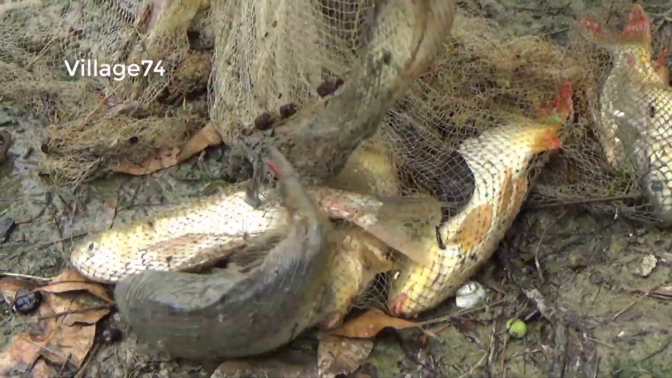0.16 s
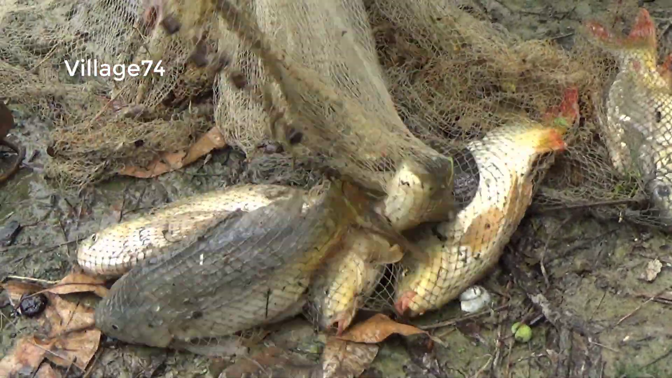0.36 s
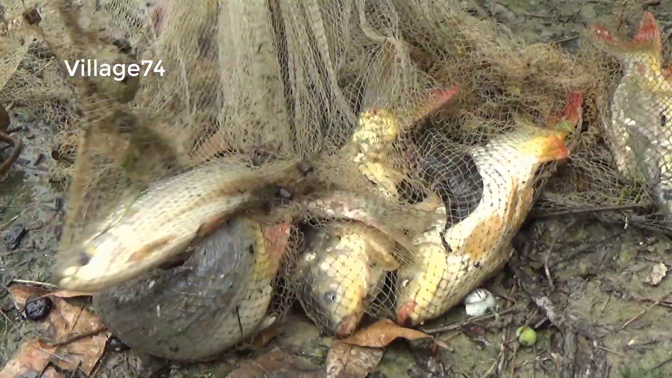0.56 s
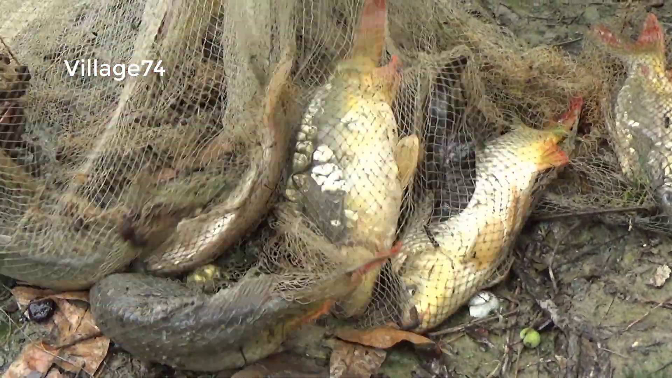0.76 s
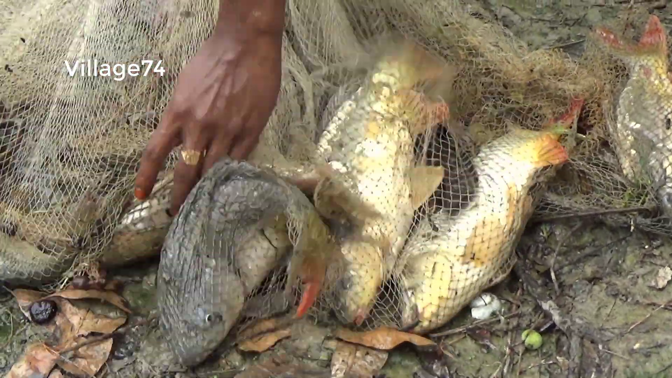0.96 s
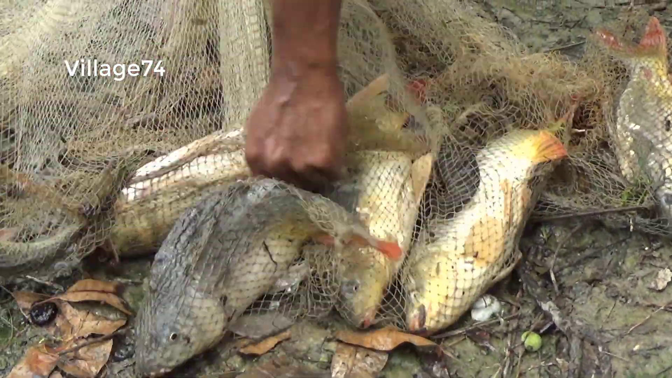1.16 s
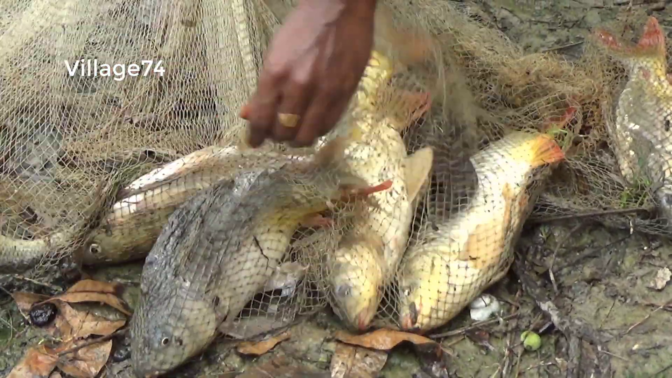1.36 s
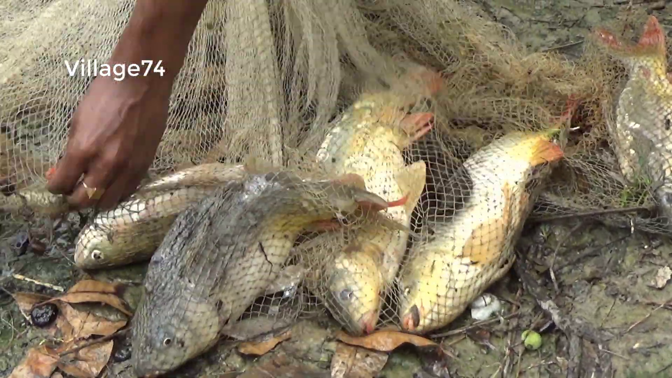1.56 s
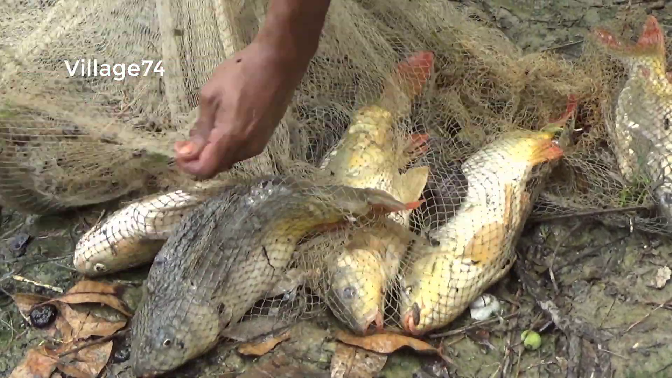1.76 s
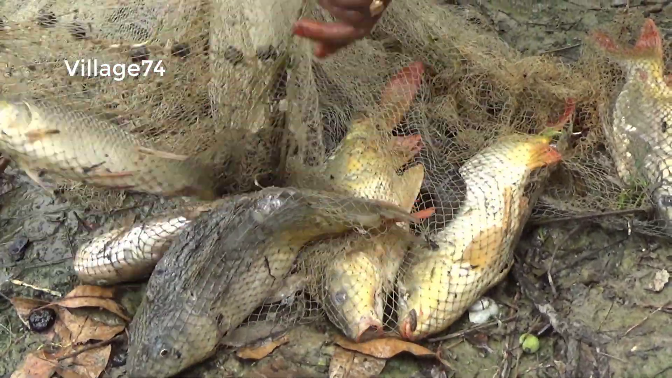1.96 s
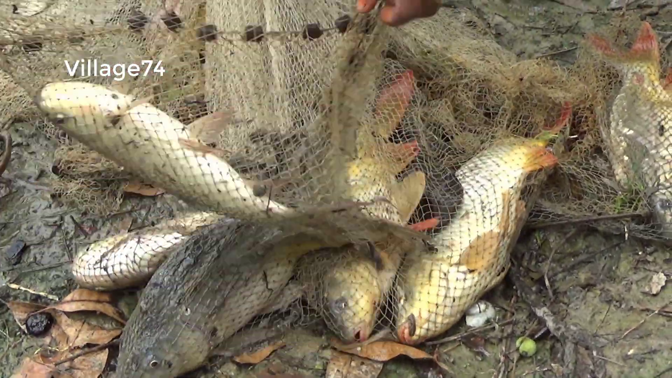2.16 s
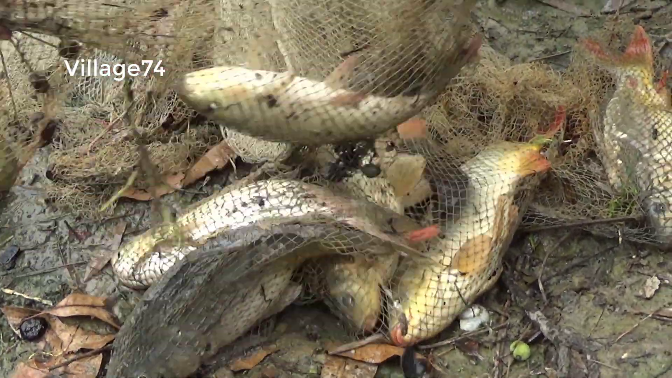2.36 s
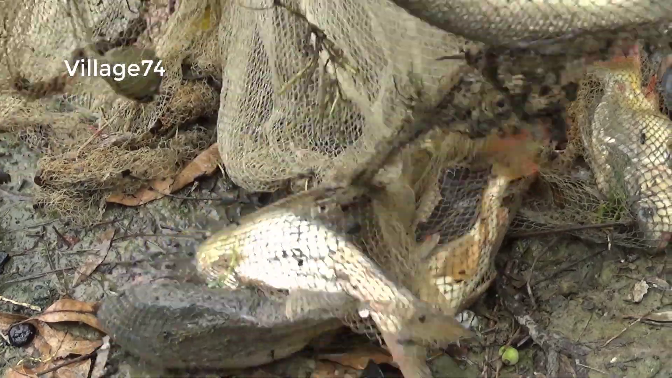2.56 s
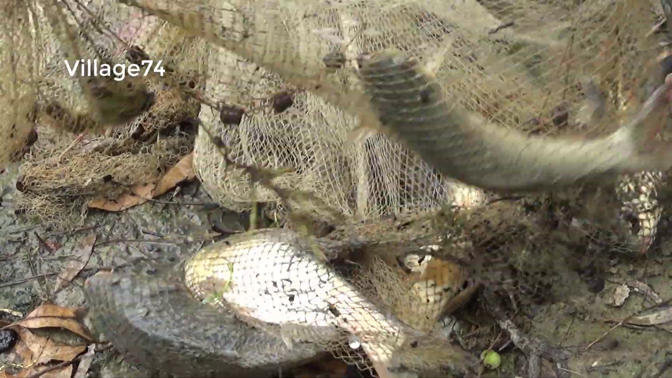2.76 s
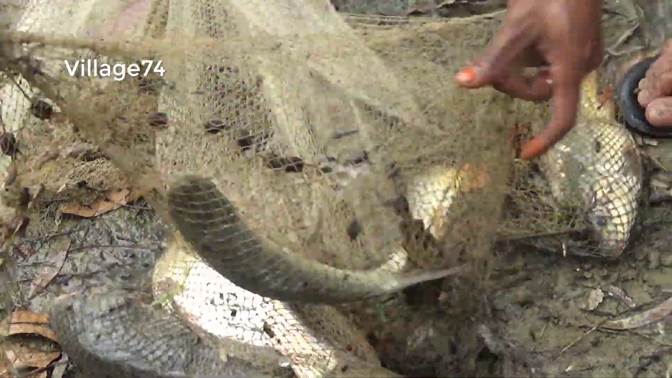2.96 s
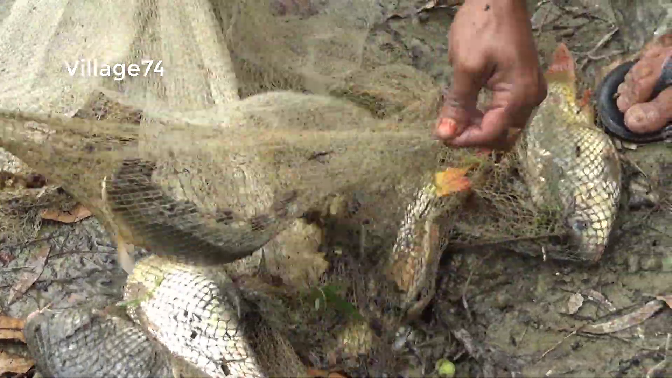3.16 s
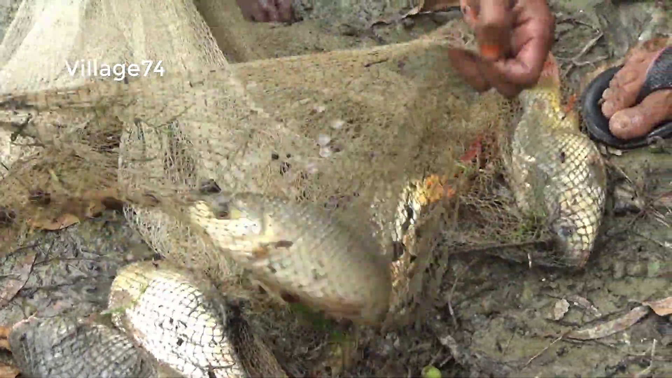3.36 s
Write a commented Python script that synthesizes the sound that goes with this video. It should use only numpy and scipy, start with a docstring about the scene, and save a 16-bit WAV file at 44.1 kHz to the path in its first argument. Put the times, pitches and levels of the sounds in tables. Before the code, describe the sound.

Freshly caught fish thrash with wet slaps and hollow knocks as a net crackles outdoors

```python
"""First a bird whistles over a quiet outdoor hush and the mesh of a net crackles on damp ground.
Then wet fish thrash: ringing modes give hollow knocks, noisy tones give wet slaps and bright snaps.
Lone blows follow, over dull thuds and the drag of the net; more birds, on the left, glide and echo.
Past two seconds the knocks return, a flank scrapes whining along the taut mesh, and the last blows land."""
import sys
import numpy as np
from scipy import signal
from scipy.fft import rfft, irfft
from scipy.io import wavfile
from scipy.ndimage import uniform_filter1d

SR = 44100
rng = np.random.default_rng(int(sys.argv[2]) if len(sys.argv) > 2 else 0)


def gain_from_db(level_db):
    """Turn a decibel level (scalar or array-like) into a linear amplitude factor."""
    decades = np.asarray(level_db, float) / 20
    return 10 ** decades


def file_out(sig):
    """Save sig as 16-bit WAV at sys.argv[1]."""
    # one column per channel
    cols = np.atleast_2d(sig).T
    # limit, then scale
    lim = np.clip(cols, -1, 1)
    pcm = np.round(lim * 32767).astype(np.int16)
    wavfile.write(sys.argv[1], SR, pcm)


N = 152145
T = np.arange(6000) / SR   # time axis of one blow [s]
LEAN = np.array([[1], [-1]])   # left up, right down

# Levels in the tables are relative; each layer trims them.
# hollow knocks of the bodies: (time [s], level [dB], pitch [Hz], lower mode against the main one [dB])
BODY_KNOCKS = [(0.11, -33.5, 850, -21), (0.237, -35.5, 873, -17), (0.302, -20, 778, -7),
               (0.315, -11, 788, -26), (0.32, -22, 755, -28), (0.352, -14.5, 818, -21.5),
               (0.486, -19.5, 800, -13.5), (0.514, -19.5, 786, -31), (0.555, -26.5, 816, -24),
               (0.62, -33.5, 854, -8), (0.673, -13.5, 782, -13.5), (0.685, -14.5, 748, -15),
               (0.695, -16.5, 817, -26), (0.798, -36.5, 711, -19), (0.853, -31.5, 887, -16),
               (0.887, -28, 875, -26), (0.909, -31, 803, -24), (0.957, -32, 832, -13),
               (1.106, -37, 800, -6.5), (1.12, -33, 880, -16), (1.367, -34, 890, -12.5),
               (1.439, -34, 817, -28), (1.552, -24.5, 873, -21), (1.565, -32, 860, -12),
               (1.73, -30, 894, -15), (1.785, -39, 890, -17), (1.916, -37, 796, -13),
               (1.939, -33.5, 690, -16), (2.223, -14, 800, -13), (2.255, -14.5, 752, -17),
               (2.382, -28.5, 792, -20), (2.507, -23, 782, -26), (2.551, -27.5, 794, -31),
               (2.675, -21.5, 860, -18.5), (2.688, -20, 790, -34), (2.704, -25, 796, -23),
               (2.827, -33, 945, -13), (2.881, -20.5, 800, -35), (2.904, -18.5, 821, -31),
               (2.911, -13.5, 800, -32), (2.942, -19.5, 832, -39), (2.957, -18.5, 808, -34),
               (3.066, -27.5, 893, -8.5), (3.156, -25.5, 832, -24), (3.173, -17, 760, -26)]
# ringing modes of a body: (multiple of pitch [ratio], level [dB], t60 [s])
BODY_MODES = [(1.002, 1, 0.041), (1.25, -11, 0.042)]
KNOCK_RISE_S = .0013
BELLY_HZ, BELLY_T60_S = 587, 0.077   # a lower mode shared by all knocks
# wet slaps of flanks: (time [s], level [dB], centre [Hz], t60 of the puff [s])
FLANK_SLAPS = [(0.3009, -9, 2520, 0.14), (0.3187, -12.5, 3730, 0.028), (0.3338, -17, 1290, 0.082),
               (0.3505, -19.5, 1860, 0.075), (0.4363, -21, 4200, 0.03), (0.5137, -22, 1460, 0.12),
               (0.6574, -21.5, 4500, 0.12), (0.6701, -10, 1970, 0.12), (0.6891, -15, 2130, 0.096),
               (0.6978, -12.5, 2130, 0.062), (0.8724, -17.5, 1880, 0.084), (1.091, -25, 3520, 0.12),
               (1.1067, -15.5, 2020, 0.04), (1.121, -17.5, 2590, 0.028), (1.2085, -22.5, 1440, 0.069),
               (1.3661, -28, 2090, 0.12), (1.437, -26.5, 2820, 0.12), (1.5392, -21.5, 2830, 0.03),
               (1.5468, -17.5, 3300, 0.048), (1.5645, -12, 2650, 0.059), (1.7292, -14, 2320, 0.05),
               (2.224, -23.5, 1447, 0.13), (2.2535, -10.5, 2073, 0.1), (2.3601, -22, 2890, 0.03),
               (2.3776, -25, 1300, 0.074), (2.5067, -23.5, 1190, 0.18), (2.6712, -25, 1250, 0.043),
               (2.6871, -19, 1570, 0.086), (2.7858, -20.5, 3840, 0.077), (2.9072, -20, 2220, 0.078),
               (2.937, -24, 1230, 0.054), (2.9553, -24, 1340, 0.086), (3.1721, -18.5, 2100, 0.053)]
SLAP_CRACK_T60_S, SLAP_TAIL_DB = .013, -8
# bright snaps of tails and taut mesh: (time [s], level [dB], centre [Hz], t60 of the spatter [s])
TAIL_SNAPS = [(0.07, -19, 9550, 0.11), (0.2408, -3, 9680, 0.072), (0.2723, -18, 9070, 0.097),
              (0.284, -12.5, 8400, 0.092), (0.2999, -3.5, 7970, 0.14), (0.3505, -10.5, 5400, 0.044),
              (0.3971, -7.5, 7960, 0.14), (0.402, -10, 6300, 0.05), (0.4129, -15, 9800, 0.059),
              (0.4354, -7, 10300, 0.1), (0.4604, -13, 9700, 0.089), (0.4797, -3.5, 10040, 0.094),
              (0.499, -2.5, 9500, 0.064), (0.5155, -3, 9500, 0.078), (0.5813, -17, 9360, 0.055),
              (0.6704, -3.5, 8370, 0.05), (0.6811, -2, 9200, 0.11), (0.686, -5, 8140, 0.14),
              (0.7043, -6.5, 9330, 0.033), (0.7996, -19.5, 9040, 0.057), (0.8544, -3.5, 7870, 0.019),
              (0.8715, 0.5, 9760, 0.12), (0.8751, -3, 8140, 0.074), (0.9038, -6, 8000, 0.045),
              (1.0925, -9.5, 8300, 0.054), (1.1066, -3.5, 7450, 0.045), (1.12, -9, 8900, 0.03),
              (1.1902, -14, 9400, 0.11), (1.2306, -14.5, 9500, 0.16), (1.3718, -15.5, 8160, 0.063),
              (1.4165, -13, 9800, 0.032), (1.4378, -13.5, 7350, 0.032), (1.5206, -8, 9300, 0.02),
              (1.5471, -5.5, 8900, 0.022), (1.5664, -2, 7375, 0.08), (1.7262, -3.5, 9300, 0.016),
              (1.7477, -11, 9370, 0.055), (2.169, -9.5, 8820, 0.019), (2.186, -20, 8100, 0.029),
              (2.2258, -19, 8450, 0.022), (2.2537, -5, 5375, 0.054), (2.5768, -12, 7550, 0.022),
              (2.604, -18.5, 9580, 0.028), (2.7713, -14, 9770, 0.061), (2.9258, -20, 8830, 0.048),
              (2.9387, -16.5, 8620, 0.08), (2.9556, -18.5, 8970, 0.071), (3.0587, -23, 9400, 0.036),
              (3.1314, -17.5, 8250, 0.054), (3.1472, -19, 5550, 0.063), (3.1742, -5, 10200, 0.027),
              (3.256, -23, 8200, 0.043), (3.272, -11, 8920, 0.092)]
SNAP_T60_S, SPATTER_DB, SPATTER_ROUGH_DB, LEAD_IN_S = .012, -11, 3.5, .002
# mesh pulled over the ground: (time [s], crackle level [dB], drag level [dB])
MESH_PULL = [(0, -38, -49), (.13, -51.5, -60.5), (.22, -53, -56), (0.378, -43.5, -44.5), (.46, -41, -45),
             (.56, -52.5, -49.5), (0.628, -44.5, -51.5), (0.719, -38.5, -39.5), (.78, -45, -56.5),
             (0.898, -35.5, -47), (1.04, -48, -53), (1.17, -44, -49), (1.318, -57, -61.5),
             (1.471, -44, -50.5), (1.65, -48, -59), (1.801, -50.5, -58.5), (2.05, -50.5, -73),
             (2.331, -50, -54.5), (2.4, -45, -41), (2.492, -40, -38), (2.58, -42, -44), (2.64, -46, -59),
             (2.78, -46.5, -49), (2.86, -50.5, -60), (2.999, -57, -55.5), (3.199, -45, -51.5),
             (3.32, -60, -67), (3.45, -54.5, -76)]
# spectrum of the mesh crackle: (frequency [Hz], level per Hz [dB])
CRACKLE_SPECTRUM = [(1500, -31), (3000, -0.5), (5000, -2), (7000, -3.5), (9500, 2), (12000, -6.5),
                    (15000, -7.5)]
# spectrum of the net dragging over soil: (frequency [Hz], level per Hz [dB])
DRAG_SPECTRUM = [(250, 12), (480, 2.5), (800, 8), (1200, 9), (2000, 8.5), (3500, 7.5), (5000, 0.5),
                 (6500, 5), (9000, 3.5)]
GRAINS_PER_S, GRAIN_SPREAD_DB, CLUMP_DB = 2000, 3.5, 3.5
TICKS_PER_S, TICK_DB = 45, -2   # lone ticks of knots
RATTLE_HZ, RATTLE_DB = 760, -5   # small bumps in the drag
# a flank along the taut mesh: (time [s], level [dB], whine of the threads [Hz])
FLANK_SCRAPE = [(2.35, -46, 4280), (2.41, -40, 4320), (2.47, -33.5, 5030), (2.52, -34, 5120),
                (2.59, -52, 4180)]
WHINE_WIDTH_HZ, WHINE_DB = 490, 3
# dull thuds on the ground: (time [s], level [dB], pitch [Hz])
GROUND_THUDS = [(0.311, -46, 282), (0.434, -44, 327), (0.491, -38, 344), (0.659, -40.5, 173),
                (0.886, -42, 265), (1.114, -34.5, 245), (1.412, -41.5, 276), (1.547, -39, 323),
                (1.723, -39, 354), (2.252, -38.5, 342), (2.39, -38.5, 362), (2.437, -35.5, 373),
                (2.683, -42, 340), (2.783, -41, 257)]
THUD_T60_S = .04
# whistle that rises and falls: (time from start [s], pitch [Hz], level [dB])
ARCH_SHAPE = [(0, 2013, -14), (.013, 2711, -16), (.021, 3323, -5), (.025, 3770, -3), (.029, 4117, 0),
              (.04, 3896, -3.5), (.043, 3650, -10), (.047, 3407, 2), (.053, 3007, -6.5), (.064, 2590, -7)]
# its notes: (time [s], level [dB])
ARCH_NOTES = [(1.563, -37.5), (1.821, -36.5), (1.981, -35.5), (2.376, -34.5), (2.632, -34.5), (2.784, -36),
              (3.046, -38), (3.205, -37.5)]
# falling whistle: (time from start [s], pitch [Hz], level [dB])
FALL_SHAPE = [(0, 3590, 10), (.014, 3350, 11), (.03, 3000, 7), (.05, 2470, 6), (.078, 1916, -8.5)]
# its notes: (time [s], level [dB])
FALL_NOTES = [(-.03, -50.5), (0.274, -49.5), (0.588, -49.5), (.915, -49), (1.229, -48.5), (1.573, -48.5),
              (1.887, -48.5), (2.235, -45.5), (2.576, -49), (2.919, -50), (3.279, -49)]
# short rising chip: (time from start [s], pitch [Hz], level [dB])
CHIP_SHAPE = [(0, 3780, 0), (.008, 5030, 2.5), (.014, 5330, -2), (.022, 5600, 0.5)]
# its notes: (time [s], level [dB])
CHIP_NOTES = [(0.159, -40.5), (0.472, -40.5), (0.786, -41), (1.108, -40), (1.438, -41.5), (1.757, -41.5),
              (2.105, -42), (2.444, -33), (2.79, -42.5), (3.148, -37.5)]
# longer downward slide: (time from start [s], pitch [Hz], level [dB])
SLIDE_SHAPE = [(0, 2637, 6), (.065, 2008, 9), (.08, 1866, -10), (.1, 1756, 1.5), (.18, 1535, 1.5),
               (.19, 1510, -18)]
# its notes: (time [s], level [dB])
SLIDE_NOTES = [(0.536, -48.5), (0.884, -48)]
# low falling coo: (time from start [s], pitch [Hz], level [dB])
COO_SHAPE = [(0, 392.5, 6), (.1, 292, 3.5), (.22, 220, 3)]
# its note: (time [s], level [dB])
COO_NOTES = [(1.75, -64.5)]
TREES_T60_S, TREES_DB, TREES_ALIKE = 0.44, 2, 0.77   # ALIKE: weight of the echo shared by both ears
LEAF_BLUR_T60_S, LEAF_BLUR_SHARE, FLUTTER_DB, BIRD_PAN_DB = .03, .6, 1.5, 5.5
# spectrum of the outdoor hush: (frequency [Hz], level [dB])
HUSH_SPECTRUM = [(15, -40), (25, 2.5), (215, 3.5), (495, -1.5), (848, -1), (1110, -5), (1620, -8),
                 (3340, 1.5), (4380, -6), (5880, -14), (10100, -51), (13500, -14), (15500, -30)]
# left-right correlation of the hush: (frequency [Hz], correlation [-])
HUSH_LIKENESS = [(60, 0.98), (180, 0.93), (550, 0.31), (1650, 0.27), (4970, 0.16), (15000, 0.99)]
HUSH_DB = -51
KNOCK_PAN_DB, NEAR_PAN_DB, NEAR_WIDTH_DB = 0.55, 0.16, -15.5
TOP_HZ = 12670


def rms_one(x):
    """Scale to rms 1."""
    return x / np.sqrt(np.mean(x ** 2) + 1e-20)


def dying(t60):
    """Decay of 60 dB in t60 seconds, held between 4 and 300 ms."""
    return gain_from_db(-60 * T / np.clip(t60, .004, .3))


def add(out, s, x):
    """Lay a sound into the track at time s, trimmed to the track's ends."""
    i = int(s * SR)
    x = x[max(-i, 0):max(N - i, 0)]
    out[max(i, 0):max(i, 0) + len(x)] += x


def band(x, hz, octaves):
    """Band-pass around a centre."""
    edges = np.clip(hz * 2 ** np.array([-octaves / 2, octaves / 2]), 20, 19000)
    return signal.sosfilt(signal.butter(2, edges, "band", fs=SR, output="sos"), x)


def low_pass(x, hz, order):
    """Roll off everything above hz."""
    return signal.sosfilt(signal.butter(order, hz, fs=SR, output="sos"), x)


def colour(x, points):
    """Shape a spectrum by (frequency [Hz], level [dB]) points; rms 1."""
    hz, db = np.transpose(points)
    f = np.maximum(np.arange(N // 2 + 1) * SR / N, 1)
    gain = gain_from_db(np.interp(np.log(f), np.log(hz), db, left=-60, right=-60))
    return rms_one(irfft(rfft(x) * gain, N))


def drift(rate):
    """Random wander of rms 1: noise through two equal poles at rate Hz."""
    r = np.exp(-16 * np.pi * rate / SR)   # runs at an eighth of the sample rate
    slow = signal.lfilter([1], [1, -2 * r, r * r], rng.standard_normal(N // 8 + 4002))[4000:]
    return np.interp(np.arange(N) / 8, np.arange(len(slow)), rms_one(slow))


def grains(per_s, clump_db):
    """Random clicks of uneven size that come in clumps; rms 1."""
    sizes = gain_from_db(GRAIN_SPREAD_DB * np.minimum(rng.exponential(1, N), 3.5)) * rng.choice([-1, 1], N)
    return rms_one(sizes * (rng.random(N) < per_s * gain_from_db(clump_db) / SR))


def knocks():
    """Each blow rings the modes of the body, swelling in softly."""
    out = np.zeros(N)
    swell = (1 - np.exp(-T / KNOCK_RISE_S)) ** 1.62
    belly = np.sin(2 * np.pi * BELLY_HZ * T) * dying(BELLY_T60_S)
    for s, db, hz, belly_db in BODY_KNOCKS:
        ring = gain_from_db(belly_db) * belly
        for multiple, mode_db, t60 in BODY_MODES:
            ring = ring + gain_from_db(mode_db) * np.sin(2 * np.pi * hz * multiple * T) * dying(t60)
        add(out, s - .001, gain_from_db(db + 3.0) * ring * swell)
    return out


def slaps():
    """A short smack that rings at the slap's centre, with an uneven wet puff of noise that outlasts it."""
    out, noise = np.zeros(N), rng.standard_normal((len(FLANK_SLAPS), 2, len(T)))
    for (s, db, hz, t60), (hiss, wobble) in zip(FLANK_SLAPS, noise):
        hiss = rms_one(band(hiss, hz, octaves=1.93))
        smack = (0.17 * hiss + 1.03 * np.sin(2 * np.pi * hz * T)) * dying(SLAP_CRACK_T60_S)
        uneven_db = 4.7 * np.clip(rms_one(uniform_filter1d(wobble, size=50)), -2, 1)
        puff = hiss * dying(t60) * gain_from_db(SLAP_TAIL_DB + uneven_db)
        add(out, s, gain_from_db(db - 2.0) * (smack + puff) * (1 - np.exp(-T * 1800)))
    return out


def snaps():
    """A short lead-in as the mesh tightens, a brief crack, then an uneven spatter of drops and knots."""
    out, noise = np.zeros(N), rng.standard_normal((len(TAIL_SNAPS), 2, len(T)))
    late = T - .01   # time from the crack itself
    crack = np.where(late < 0, np.exp(late * 4000), gain_from_db(-60 * late / SNAP_T60_S))
    for (s, db, hz, t60), (hiss, wobble) in zip(TAIL_SNAPS, noise):
        rough = gain_from_db(SPATTER_DB + SPATTER_ROUGH_DB * rms_one(uniform_filter1d(wobble, size=40)))
        dying_spatter = gain_from_db(-60 * late / np.clip(t60, .008, .3))
        spatter = np.where(late < 0, np.exp(late / LEAD_IN_S), dying_spatter)
        hiss = rms_one(band(hiss, hz, octaves=1.0) + 0.62 * band(hiss, hz, octaves=0.62))
        tone = np.sin(2 * np.pi * hz * T)
        add(out, s - .0088, gain_from_db(db - 14) * ((0.85 * hiss + tone) * crack + hiss * rough * spatter))
    return out


def mesh():
    """Clumped grains and lone ticks of knots slipping, and the duller drag of the net over the soil."""
    s, crackle_db, drag_db = np.transpose(MESH_PULL)
    t, clump = np.arange(N) / SR, CLUMP_DB * drift(25)
    crackle_grit, drag_grit = (
        grains(GRAINS_PER_S, clump) + 0.63 * rng.standard_normal(N) * gain_from_db(clump) for _ in range(2))
    # each tick is a short burst of noise
    tick_envelope = np.abs(np.convolve(grains(TICKS_PER_S, clump), dying(0.016)[:600])[:N])
    ticks = rms_one(rng.standard_normal(N) * tick_envelope)
    crackle = colour(crackle_grit + gain_from_db(TICK_DB) * ticks, CRACKLE_SPECTRUM)
    bumps = band(grains(220.0, clump), RATTLE_HZ, octaves=0.56)
    bumps = rms_one(band(bumps, RATTLE_HZ, octaves=0.49))
    drag = colour(drag_grit, DRAG_SPECTRUM) + gain_from_db(RATTLE_DB) * bumps
    crackle_gain = gain_from_db(np.interp(t, s, crackle_db) + 3.5)
    drag_gain = gain_from_db(np.interp(t, s, drag_db) + 5.5)
    return crackle_gain * crackle + drag_gain * drag


def scrape():
    """Dense, gritty friction noise; the threads whine in a gliding band, and an octave above."""
    s, db, hz = np.transpose(FLANK_SCRAPE)
    t, noise = np.arange(N) / SR, rng.standard_normal((3, N))
    phase = 2 * np.pi * np.cumsum(np.interp(t, s, hz)) / SR
    # slow noise on a sine makes a narrow band around it
    slow = rms_one(low_pass(noise[1], WHINE_WIDTH_HZ, 2))
    slow_octave = rms_one(low_pass(noise[2], WHINE_WIDTH_HZ * 2, 2))
    whine = slow * np.sin(phase) + 0.33 * slow_octave * np.sin(2 * phase)
    grit = colour(noise[0] + 1.5 * grains(2500.0, 3.0 * drift(50)), CRACKLE_SPECTRUM)
    gain = gain_from_db(np.interp(t, s, db, left=-120, right=-120) + drift(40))
    return gain * (grit + gain_from_db(WHINE_DB) * whine)


def thuds():
    """A low push and a dull puff where a body meets the soil."""
    out, noise = np.zeros(N), rng.standard_normal((len(GROUND_THUDS), len(T)))
    for (s, db, hz), hiss in zip(GROUND_THUDS, noise):
        push = np.sin(2 * np.pi * hz * T) * dying(THUD_T60_S)
        puff = 0.37 * rms_one(band(hiss, 193, octaves=1.73)) * dying(0.11)
        add(out, s - .002, gain_from_db(db + 6.5) * (push + puff) * (1 - np.exp(-T * 600)))
    return out


def whistle(shape):
    """One bird note: a sine that glides in pitch and level along its shape."""
    s, hz, db = np.transpose(shape)
    t = np.arange(int(s[-1] * SR)) / SR
    tone = np.sin(2 * np.pi * np.cumsum(np.interp(t, s, hz)) / SR)
    return tone * gain_from_db(np.interp(t, s, db)) * np.sin(np.pi * t / s[-1]) ** 0.094   # soft ends


def tree_echo(far):
    """Echo of leaves and trunks: dying noise, partly shared by both ears."""
    t = np.arange(SR // 2) / SR
    noise = rng.standard_normal((3, len(t)))
    tail = TREES_ALIKE * noise[0] + 0.47 * noise[1:]
    tail = tail * gain_from_db(-60 * t / TREES_T60_S) * (1 - np.exp(-t * 200))
    return signal.fftconvolve(far[None], tail / np.sqrt(np.sum(tail ** 2) / 2), axes=1)[:, :N]


def birds():
    """Gliding whistles on the left, smeared by the echo of leaves and trunks."""
    direct, far = np.zeros(N), np.zeros(N)   # far feeds the trees, by each bird's distance
    # (shape, notes, direct level [dB], level into the trees [dB])
    calls = [(ARCH_SHAPE, ARCH_NOTES, 6.5, -4), (FALL_SHAPE, FALL_NOTES, 0.3, 2.2),
             (CHIP_SHAPE, CHIP_NOTES, 0, 2.5), (SLIDE_SHAPE, SLIDE_NOTES, 1.5, 2.1),
             (COO_SHAPE, COO_NOTES, 3, -5)]
    for shape, notes, direct_db, far_db in calls:
        note = whistle(shape)
        for start, db in notes:
            add(direct, start, gain_from_db(db + direct_db) * note)
            add(far, start, gain_from_db(db + far_db) * note)
    direct = direct * gain_from_db(FLUTTER_DB * drift(54))   # moving leaves break the line up
    blur = rng.standard_normal(1500) * dying(LEAF_BLUR_T60_S)[:1500]
    blurred = signal.fftconvolve(direct, blur / np.sqrt(np.sum(blur ** 2)))[:N]
    direct = 0.42 * direct + LEAF_BLUR_SHARE * blurred
    return direct * gain_from_db(BIRD_PAN_DB * LEAN) + gain_from_db(TREES_DB) * tree_echo(far) * gain_from_db(.8 * LEAN)


def hush():
    """Shaped noise that wanders in level; its left-right likeness is set by frequency."""
    mid, side = (rfft(colour(rng.standard_normal(N), HUSH_SPECTRUM)) for _ in range(2))
    hz, alike = np.transpose(HUSH_LIKENESS)
    f = np.arange(len(mid)) * SR / N + 1
    alike = np.clip(np.interp(np.log(f), np.log(hz), alike), 0, 1)
    mid = np.sqrt((1 + alike) / 2) * mid
    side = np.sqrt((1 - alike) / 2) * side
    return gain_from_db(HUSH_DB + drift(3.7)) * np.array([irfft(mid + side, N), irfft(mid - side, N)])


def scene():
    """Fish and net close in front, with short echoes off the ground that differ by ear."""
    low = knocks() + slaps()
    near = snaps() + thuds() + mesh() + scrape()
    echo = rng.standard_normal(400) * dying(.015)[:400]
    echoed = np.convolve(low + 0.65 * near, echo / np.sqrt(np.sum(echo ** 2)))[:N]
    side = band(echoed, 4000, octaves=6.4)
    front = low * gain_from_db(KNOCK_PAN_DB * LEAN) + near * gain_from_db(NEAR_PAN_DB * LEAN)
    return front + gain_from_db(NEAR_WIDTH_DB) * side * LEAN + birds() + hush()


def top_cut(x):
    """Nothing passes above the cut-off."""
    return signal.sosfilt(signal.butter(12, 16470, fs=SR, output="sos"), x)


def record(dry):
    """The microphone rolls off the top."""
    mix = low_pass(dry, TOP_HZ, 4)
    return top_cut(mix)


dry = scene()
out = record(dry)
file_out(out)
```